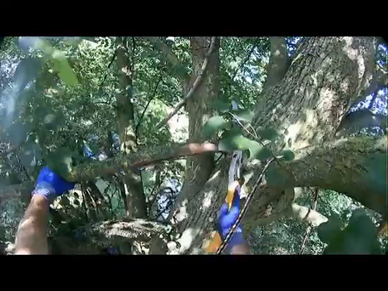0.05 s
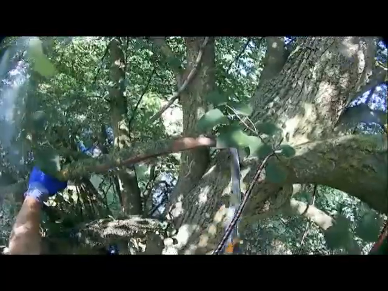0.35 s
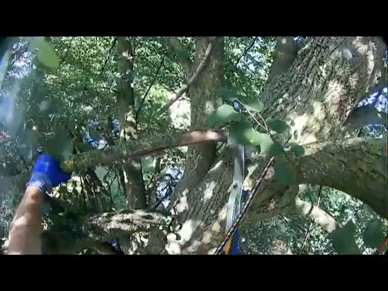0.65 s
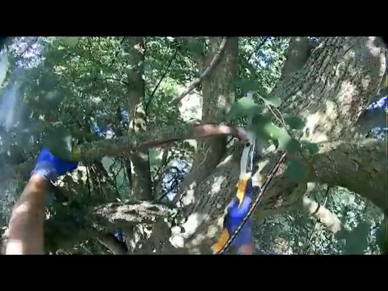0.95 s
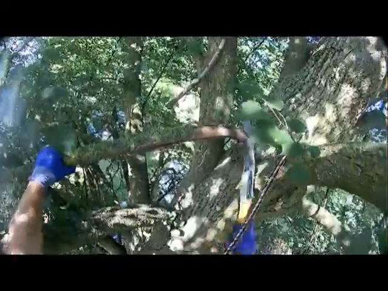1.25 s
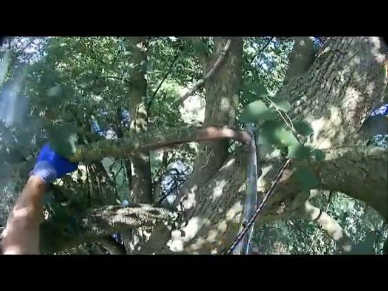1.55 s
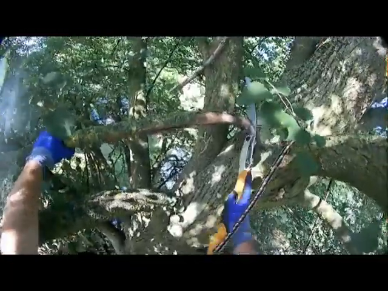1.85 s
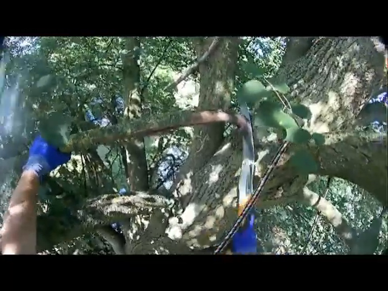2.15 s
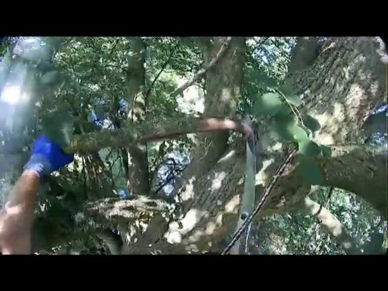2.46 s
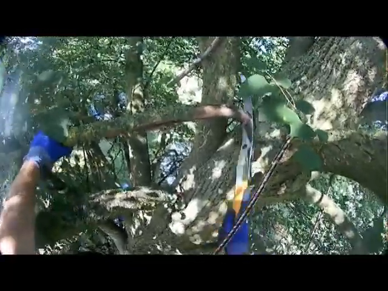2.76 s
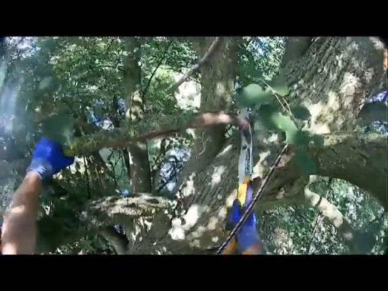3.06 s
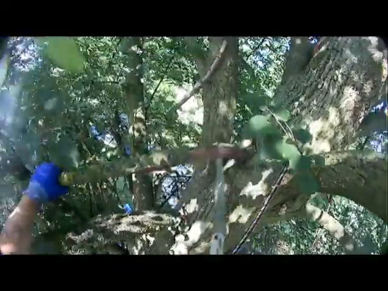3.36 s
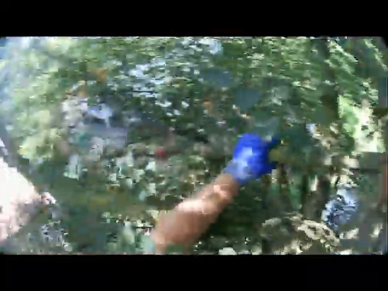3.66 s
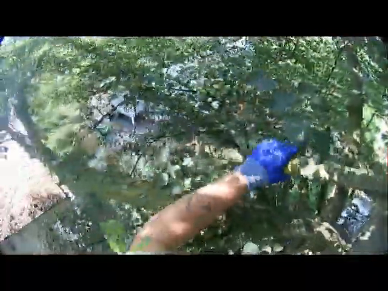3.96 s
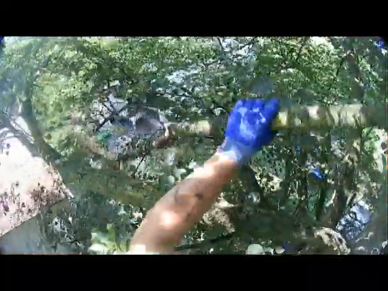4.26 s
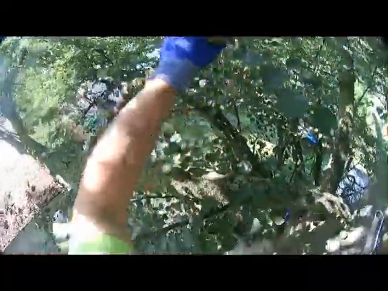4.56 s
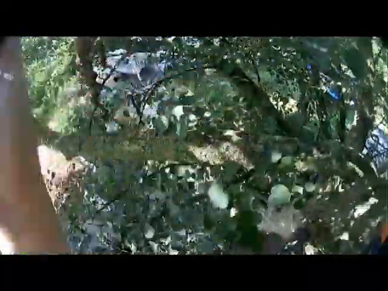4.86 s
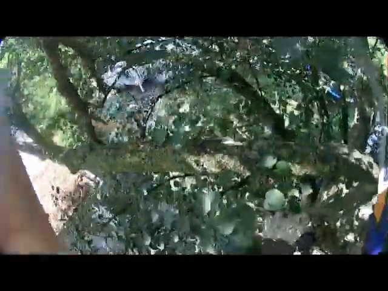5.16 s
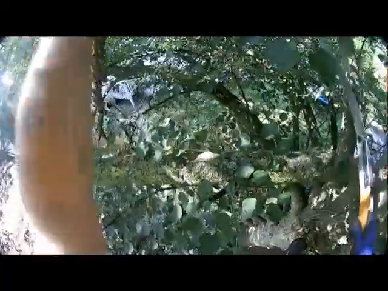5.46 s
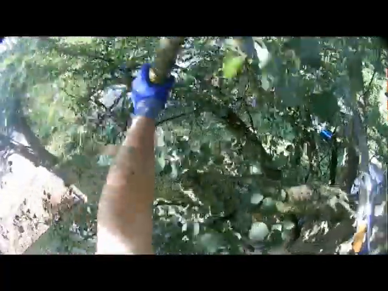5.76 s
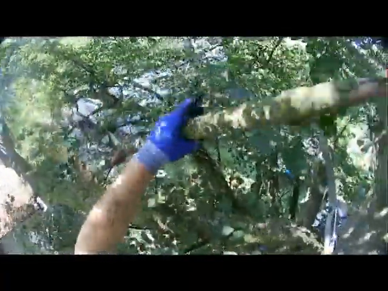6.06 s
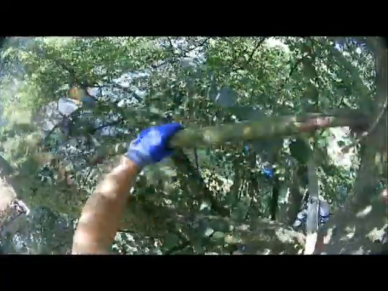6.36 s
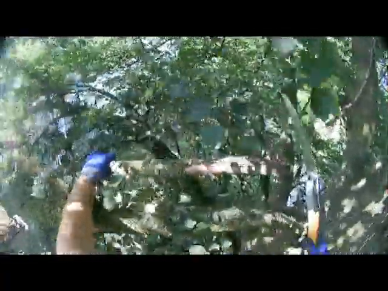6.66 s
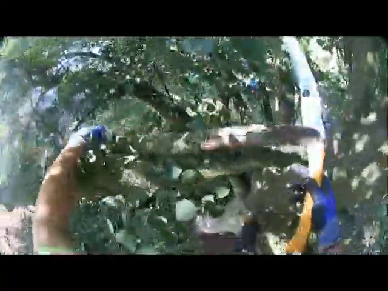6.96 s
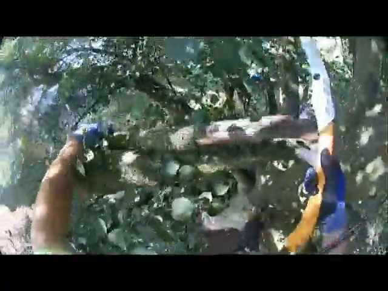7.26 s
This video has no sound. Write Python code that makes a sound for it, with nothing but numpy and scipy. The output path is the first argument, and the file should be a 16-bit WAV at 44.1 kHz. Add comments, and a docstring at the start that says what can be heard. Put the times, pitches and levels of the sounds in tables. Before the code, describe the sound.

Close by, a hand saw cuts a branch in quick, rasping back-and-forth strokes with small clicks, and squeaks briefly as it breaks through. A heavy thump hits the body-worn microphone. The freed branch then brushes through leaves, with wooden knocks, twig snaps, short bark scrapes and soft bumps. Trees hiss steadily all around over a low rumble.

```python
"""Pruning saw in a wood

Among hissing trees, on the microphone of a body-worn camera, a saw at arm's length cuts a branch in
sixteen quick strokes and squeaks as it breaks through. The freed branch is swung through the leaves:
a heavy thump on the camera, wooden knocks and twig ticks close by.
The camera samples coarsely, which mirrors the sound into the treble."""
import sys
import numpy as np
from scipy import signal
from scipy.fft import rfft, irfft, next_fast_len
from scipy.io import wavfile

SR = 44100
rng = np.random.default_rng(int(sys.argv[2]) if len(sys.argv) > 2 else 0)


def materialize(psi):
    """Save the field psi as 16-bit PCM at rate SR to the path in sys.argv[1].

    A 1-D psi becomes a single channel; in a 2-D psi each row is a channel.
    """
    bounded = np.clip(np.atleast_2d(psi).T, -1, 1)
    quanta = np.round(bounded * 32767).astype(np.int16)
    wavfile.write(sys.argv[1], SR, quanta)


N = 322371
TIME = np.arange(N) / SR
CUT_THROUGH_S = 3.56  # the blade leaves the wood

# push and pull in turn, each lasting until the next:
# (start [s], rasp [dB], bite = upper against lower resonances [dB], fastest at [share of stroke])
STROKES = [ (0.0, -48.5, -5.5, 0.634), (0.279, -43, -2, .5), (0.52, -44, -5, .52), (0.746, -43, -1, 0.48),
           (0.957, -44, -5.5, .45), (1.167, -44.5, 0.5, 0.56), (1.381, -41, -6, .52),
           (1.572, -43.5, -1, .6), (1.82, -43.5, -6.5, .47), (2.033, -42, -2.5, .55),
           (2.25, -43.5, -6.5, .5), (2.468, -40, -5.5, .55), (2.69, -41.5, -10, .57),
           (2.908, -39.5, -8.5, 0.54), (3.118, -44, -9, 0.407), (3.343, -45.5, -7, .62)]
# lower and upper ringing resonances that colour the rasp, snags and leaves:
# (frequency [Hz], width [Hz], gain [dB])
LOW_MODES = [(1211, 220, 0.5), (1273, 82.7, 7.5), (1490, 87, -3.5), (1647, 87, 2.5), (1791, 102, 3),
             (2058, 69, -4.5)]
HIGH_MODES = [(2136, 78, 2), (2368, 98, 2.5), (2563, 110, 0), (2662, 125, 1.5), (2994, 120, -1.5),
              (3177, 290, -5)]


def from_db(db):
    """Decibels to gain."""
    return 10 ** (np.asarray(db) / 20)


def rms_one(x):
    """Scale to unit power."""
    return x / np.sqrt(np.mean(x ** 2) + 1e-20)


def in_time(rows):
    """Each column of a curve at every sample."""
    s, *columns = np.transpose(rows)
    return [np.interp(TIME, s, c) for c in columns]


def swells(rows):
    """Gain of overlapping bell-shaped swells; their powers add."""
    bells = (from_db(db) * np.exp(-np.minimum(((TIME - s) / half) ** 2, 20)) for s, half, db in rows)
    return np.sqrt(sum(bell ** 2 for bell in bells))


def drift(hz):
    """Slow random wander of spread 1."""
    step, settle = 40, 2000
    r = np.exp(-2 * np.pi * hz * step / SR)
    noise = rng.standard_normal(N // step + settle + 2)
    slow = signal.lfilter([1], [1, -2 * r, r * r], noise)[settle:]
    return np.interp(np.arange(N) / step, np.arange(len(slow)), rms_one(slow))


def butterworth(x, hz, kind, order=2):
    """High- or low-pass filter."""
    return signal.sosfilt(signal.butter(order, hz, kind, fs=SR, output="sos"), x)


def coloured_noise(spectrum):
    """Noise with the given spectrum, rms 1."""
    hz, db = np.transpose(spectrum)
    size = next_fast_len(N)
    grid = np.maximum(np.fft.rfftfreq(size, 1 / SR), 1)
    gain = from_db(np.interp(np.log(grid), np.log(hz), db))
    return rms_one(irfft(rfft(rng.standard_normal(size)) * gain, size)[:N])


def resonate(force, modes):
    """Parallel resonances of alternating sign; a white force roughly keeps its power."""
    out, power = 0, 0
    for k, (hz, width, db) in enumerate(modes):
        r = np.exp(-np.pi * width / SR)
        gain = (1 - r * r) / 2
        feedback = [1, -2 * r * np.cos(2 * np.pi * hz / SR), r * r]
        ring = signal.lfilter([gain, 0, -gain], feedback, force + 1e-18)
        out = out + (-1) ** k * from_db(db) * ring
        power += gain * from_db(db) ** 2
    return out / np.sqrt(power)


def grains(per_s, spread_db):
    """Random tiny fractures of uneven size, rms 1."""
    sizes = from_db(spread_db * np.minimum(rng.exponential(1, N), 4)) * rng.choice([-1, 1], N)
    return rms_one(sizes * (rng.random(N) < per_s / SR))


def strike(events, modes, click_share):
    """Each contact splits its energy between a sharp click and a dying crunch; both ring the modes."""
    crunch, clicks = np.zeros(N), np.zeros(N)
    for s, db, fade in events:
        start = int(s * SR)
        t = TIME[:min(SR // 2, N - start)]
        dying = from_db(db - 20 * t / fade)  # 20 dB down after one fade
        crunch[start:start + len(t)] += dying
        clicks[start] += np.sqrt(np.sum(dying ** 2))
    crunch *= rng.choice([-1, 1], N)
    return resonate(np.sqrt(click_share) * clicks + np.sqrt(1 - click_share) * crunch, modes)


def blade_motion():
    """Strokes done so far (1 per stroke) and the blade's speed, 0 at each turn and 1 at its fastest."""
    starts, _, _, fastest = np.transpose(STROKES)
    turns = np.append(starts, CUT_THROUGH_S)
    peaks = starts + fastest * np.diff(turns)
    marks = np.sort(np.concatenate([turns, peaks]))
    done = np.interp(TIME, marks, np.arange(len(marks)) / 2)
    return done, np.abs(np.sin(np.pi * done))


def trees(level_db=-52):
    """Trees hiss steadily all round the microphone."""
    # colour of the hiss: (frequency [Hz], relative level [dB])
    spectrum = [(30, 1), (100, 0.5), (200, -1), (300, -4.5), (410, -4), (560, -7.5), (800, -9), (1100, -11),
                (1300, -10.5), (1800, -11.5), (2300, -16), (3100, -16), (3400, -21.5), (3700, -32.5)]
    return from_db(level_db) * coloured_noise(spectrum)


def woodland_echoes(x, t60_s=0.3, count=160):
    """Trunks and foliage farther off scatter many faint, dull echoes."""
    out = np.zeros(N)
    for delay in rng.uniform(.006, .22, count):
        lag = int(delay * SR)
        out[lag:] += rng.choice([-1, 1]) * from_db(-60 * delay / t60_s) * x[:-lag]
    return butterworth(out, 2000, "low") / np.sqrt(count)


def body_sway(lurch_db=1.5):
    """The wearer rocks the camera: a low rumble, with a lurch at each turn of the saw."""
    # strength of the rocking: (time [s], level [dB])
    rocking = [(0, -42.5), (.7, -37.5), (1.6, -36.5), (2.7, -40.5), (3.7, -35), (3.95, -40), (5.2, -35.5),
               (6.5, -43.5), (7.0, -34)]
    # colour of the rumble: (frequency [Hz], relative level [dB])
    spectrum = [(4, -7), (12, -4.5), (25, -5.5), (45, -22.5), (70, -19.5), (110, -28), (200, -56),
                (500, -87), (1500, -110)]
    sway_db, = in_time(rocking)
    _, speed = blade_motion()
    lurch = (1 - speed) * (TIME < CUT_THROUGH_S)
    return from_db(sway_db + lurch_db * lurch) * coloured_noise(spectrum)


def mount_bumps():
    """Soft bumps ring the camera mount, right at the microphone."""
    # bumps on the mount: (time [s], level [dB], fade [s])
    bumps = [(3.585, -34, 0.043), (3.65, -46.5, 0.079), (3.701, -39.5, 0.083), (4.323, -34, 0.037),
             (4.59, -49, .03), (4.781, -29.5, 0.013), (4.801, -27, 0.015), (4.93, -36, 0.029),
             (4.964, -31, 0.036), (5.769, -32, 0.033), (6.06, -50, .03), (6.611, -41, 0.028),
             (7.02, -48, .06), (7.09, -44, 0.049), (7.263, -44.5, 0.029)]
    # resonances of the mount: (frequency [Hz], width [Hz], gain [dB])
    modes = [(145, 82, -1), (260, 86, 1), (396, 69, 4), (456, 86, -2.5)]
    return strike(bumps, modes, click_share=0.52)


def thump(sharpness=2.15):
    """A heavy blow shakes the camera for a few slow cycles."""
    # the jolt and its rebounds: (start [s], envelope peak [dB], frequency [Hz], swell [s])
    jolts = [(4.3197, -5, 69.2, 0.0119), (4.364, -21, 62.6, 0.0059), (4.408, -25, 30, .009)]
    out = 0
    for s, db, hz, swell in jolts:
        t = np.maximum(TIME - s, 0)
        envelope = (t / swell * np.exp(1 - t / swell)) ** sharpness
        out = out + from_db(db) * envelope * np.sin(2 * np.pi * hz * t)
    return out


def leaves(clump_db=3.0):
    """Leaves and twigs brush past in clumps of small ticks as the branch is swung."""
    # sweeps through the foliage: (centre [s], half length [s], level [dB])
    brushes = [(3.7, 0.057, -53), (4.25, 0.17, -55), (4.45, 0.032, -53), (4.78, 0.061, -54),
               (5.05, 0.057, -48.5), (5.22, 0.086, -50.5), (5.65, 0.33, -56), (5.9, 0.13, -46.5),
               (6.26, 0.13, -58), (6.6, 0.14, -53), (7.09, 0.26, -55)]
    force = grains(per_s=2500, spread_db=0.5) * swells(brushes) * from_db(clump_db * drift(25))
    return from_db(-2.5) * resonate(force, LOW_MODES) + from_db(-11) * resonate(force, HIGH_MODES)


def bark_chafes():
    """Bark rubs on bark in short, ringing scrapes."""
    # scrapes: (time [s], level [dB], fade [s])
    chafes = [(5.371, -45, 0.028), (5.408, -36, 0.021), (5.445, -56, .04), (5.475, -53, 0.059),
              (5.52, -53, .04), (5.852, -46.5, 0.077), (5.89, -59, 0.055), (5.975, -58, 0.054)]
    # resonances of the bark: (frequency [Hz], width [Hz], gain [dB])
    modes = [(1700, 47, 10.5), (1930, 150, 2), (2170, 270, -6.5)]
    return strike(chafes, modes, click_share=0.25)


def twig_snaps():
    """Dry twigs break close by and ring briefly."""
    # breaks: (time [s], level [dB], fade [s])
    snaps = [(4.803, -54, 0.0074), (5.069, -31, 0.022), (5.332, -41.5, 0.015), (5.623, -46.5, 0.016)]
    # resonances of a twig: (frequency [Hz], width [Hz], gain [dB])
    modes = [(720, 61, 2), (1260, 130, -1), (1820, 93, 5), (2410, 91, 0.5), (2480, 150, -6),
             (3090, 380, -4)]
    return strike(snaps, modes, click_share=0.31)


def branch_knocks():
    """The branch rings as it knocks against other wood."""
    # contacts: (time [s], level [dB], fade [s])
    knocks = [(.893, -33, 0.0077), (2.646, -36, 0.014), (4.802, -32, 0.015), (4.946, -26.5, 0.013),
              (4.952, -24.5, 0.016), (4.961, -31.5, 0.023), (4.977, -39, 0.018), (6.612, -45, 0.018)]
    # resonances of the branch: (frequency [Hz], width [Hz], gain [dB])
    modes = [(434, 76, -3.5), (800, 100, -15.5), (1028, 46, -1.5), (1287, 60, 1.5), (1550, 56, 4),
             (1783, 84, -2), (1924, 29, -1), (2335, 140, -9), (3080, 125, -14)]
    return strike(knocks, modes, click_share=0.54)


def snags(upper_db=-8):
    """Snagging teeth and flicking twigs give short, ringing clicks."""
    # snags and flicks: (time [s], level [dB], fade [s])
    catches = [(.608, -41, 0.012), (.893, -47, .01), (1.335, -27, 0.017), (1.618, -30.5, 0.02),
               (1.785, -36.5, 0.034), (2.366, -26.5, 0.0082), (2.645, -42, 0.012), (2.842, -33.5, 0.011),
               (2.981, -40, 0.022), (3.471, -34, 0.045), (3.772, -44.5, 0.026), (4.202, -41, 0.024),
               (4.322, -30, 0.026), (4.345, -45, 0.19), (4.391, -43.5, 0.023), (4.450, -49, 0.018),
               (4.813, -50, 0.025), (5.595, -48, 0.03), (6.612, -55, 0.025), (6.837, -43.5, .022)]
    upper_modes = [(hz, width, db + upper_db) for hz, width, db in HIGH_MODES]
    return strike(catches, LOW_MODES + upper_modes, click_share=0.24)


def judder():
    """The branch judders as the teeth drag through: low swells of gliding pitch."""
    # vibrations: (centre [s], half length [s], frequency [Hz], glide [Hz/s], level [dB])
    judders = [(0.406, 0.033, 79.3, -2, -28), (0.827, .03, 85, 243, -29.5), (0.886, 0.047, 107, -200, -44),
               (1.248, 0.03, 80.3, 554, -26.5), (1.663, 0.016, 84, 502, -32.5), (1.719, .04, 92, -100, -42),
               (2.132, 0.046, 95.4, -3, -43), (2.338, 0.028, 86, 300, -42.5),
               (2.538, 0.039, 85.1, 602, -35.5), (2.675, 0.058, 149, -200, -42.5),
               (2.998, 0.035, 85, 449, -36.5)]
    out = np.zeros(N)
    for s, half, hz, glide, db in judders:
        span = np.abs(TIME - s) < .2
        t = TIME[span] - s
        cycles = hz * t + glide * t * t / 2 + rng.random()
        out[span] += from_db(db) * np.exp(-(t / half) ** 2) * np.sin(2 * np.pi * cycles)
    return out


def squeak(waver=0.0132, flutter_db=3.5, lower_ratio=.535, lower_db=-8):
    """On the way out, stick-slip sets two blade modes singing in an unsteady, falling tone."""
    # course of the upper mode: (time [s], frequency [Hz], level [dB])
    course = [(3.47, 2350, -71), (3.495, 2317, -50), (3.533, 2314, -51), (3.544, 2310, -35),
              (3.554, 2197, -43.5), (3.565, 2334, -43.5), (3.576, 2180, -49.5), (3.625, 2190, -66),
              (3.68, 2170, -81)]
    hz, db = in_time(course)
    out = 0
    for ratio, mode_db in [(1, 0), (lower_ratio, lower_db)]:
        cycles = np.cumsum(ratio * hz * (1 + waver * drift(200))) / SR
        level = from_db(db + mode_db + flutter_db * drift(120))
        out = out + level * np.sqrt(2) * np.sin(2 * np.pi * cycles)
    return out * (TIME > course[0][0]) * (TIME < course[-1][0])


def blade_echo(force, done, near_s=0.00222, far_s=.0062, share=0.49):
    """Bending waves return from the handle over a changing path, so ridges glide through the rasp."""
    travel = (1 - np.cos(np.pi * done)) / 2
    delay = near_s + (far_s - near_s) * travel
    once = np.interp(TIME - delay, TIME, force)
    twice = np.interp(TIME - 2 * delay, TIME, force)
    return (force + share * once + share ** 2 * twice) / np.sqrt(1 + share ** 2 + share ** 4)


def saw(tooth_hz=230, tooth_depth=0.3, catch_db=0.73, low_db=5.5, high_db=4.5, speed_law=0.65):
    """Teeth tear fibres in quick uneven bursts; a faster blade bites louder and a little brighter."""
    # the last fibres tear: (centre [s], half length [s], level [dB])
    tears = [(3.595, .035, -48)]
    push_swell_db, pull_swell_db = 21.5, 26  # rasp at full speed above the rasp at the turn
    turn_dull_db, tear_bite_db = 0.5, -16
    done, speed = blade_motion()
    stroke = np.minimum(done.astype(int), len(STROKES) - 1)
    _, stroke_db, bite_db, _ = np.array(STROKES)[stroke].T
    slack = 1 - speed ** speed_law
    swell_db = np.where(stroke % 2, pull_swell_db, push_swell_db)
    cutting = from_db(stroke_db - swell_db * slack) * (TIME < CUT_THROUGH_S)
    tearing = swells(tears)
    teeth = np.cumsum(tooth_hz * speed * (1 + 0.094 * drift(36.7))) / SR
    pressure = (1 + tooth_depth * np.cos(2 * np.pi * teeth)) * from_db(catch_db * drift(45))
    force = blade_echo(rms_one(pressure * grains(per_s=7000, spread_db=1.5)), done)
    bite = from_db(bite_db - turn_dull_db * slack)
    low = resonate(force * np.hypot(cutting, tearing), LOW_MODES)
    high = resonate(force * np.hypot(cutting * bite, tearing * from_db(tear_bite_db)), HIGH_MODES)
    rasp = from_db(low_db) * low + from_db(high_db) * high
    return butterworth(rasp, 1000, "high", order=3)


def scene(echo_db=-9):
    """Close sawing and branch handling in the wood, plus what reaches the microphone via its mount."""
    contacts = snags() + branch_knocks() + twig_snaps() + bark_chafes()
    close = saw() + squeak() + contacts + leaves()
    mount = judder() + thump() + mount_bumps() + body_sway()
    return (close + from_db(echo_db) * woodland_echoes(close) + mount + trees())[None]


def record(dry, band_hz=3620, camera_rate_hz=8000, lift_db=1.5, tick_s=2.118, tick_db=-35):
    """The camera clips peaks and joins coarse samples with straight lines: mirror images above 4 kHz."""
    narrow = butterworth(dry[0], band_hz, "low", order=26)
    clipped = np.clip(narrow, -.5, .5)
    instants = np.arange(0, N / SR, 1 / camera_rate_hz)
    samples = np.interp(instants, TIME, clipped)
    joined = np.interp(TIME, instants, samples)
    bright = joined + (from_db(lift_db) - 1) * butterworth(joined, 7800, "high", order=1)
    tick = from_db(tick_db) * (np.arange(N) == int(tick_s * SR))  # one faint, dry tick
    return butterworth(bright + tick, 15700, "low", order=20)[None]


dry = scene()
out = record(dry)
materialize(out)
```